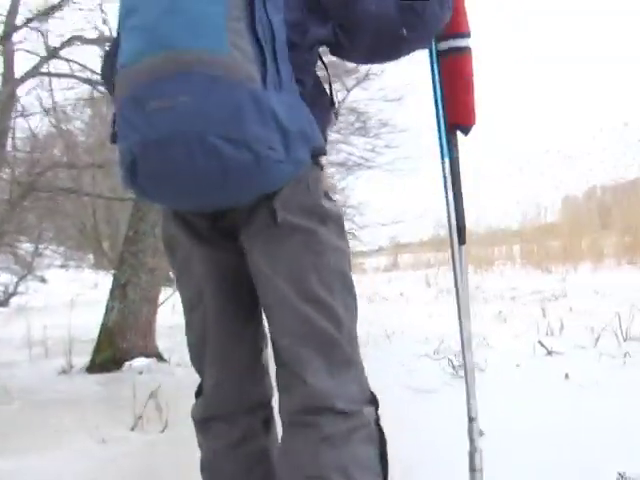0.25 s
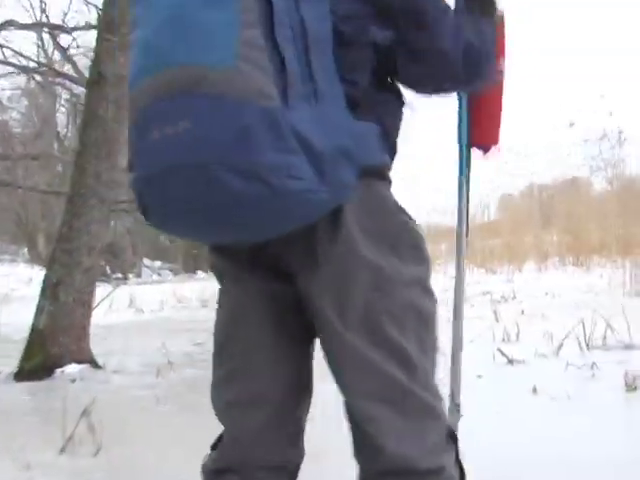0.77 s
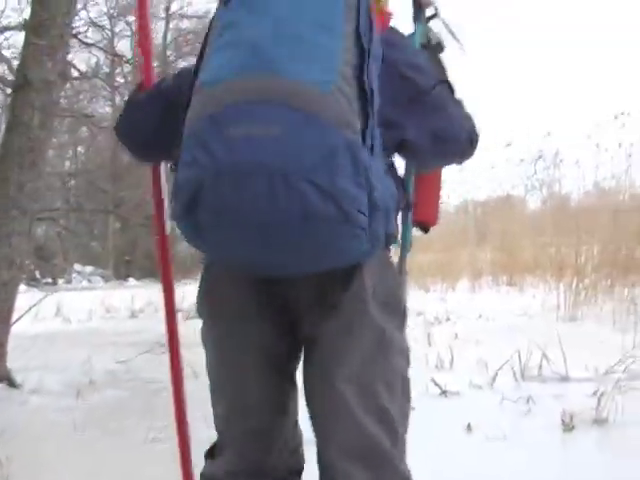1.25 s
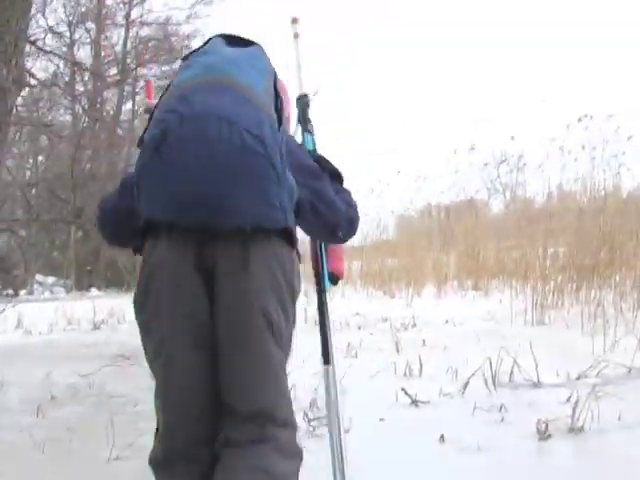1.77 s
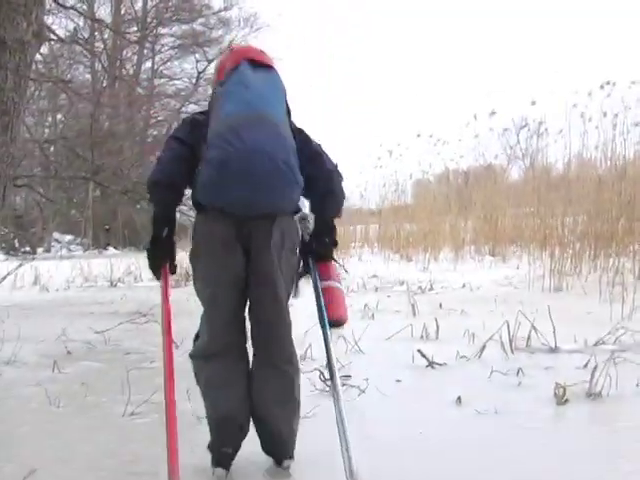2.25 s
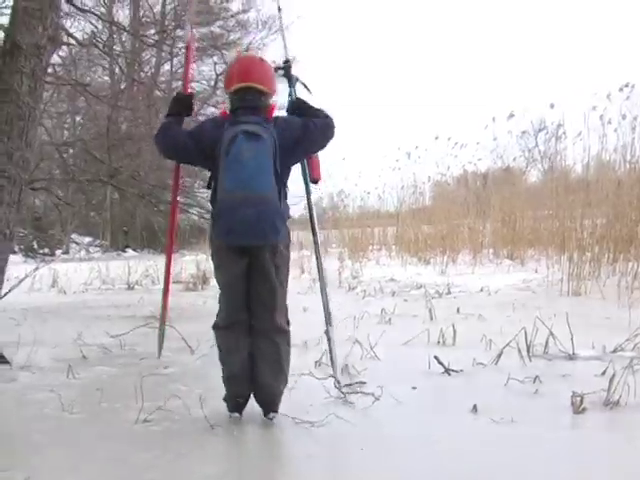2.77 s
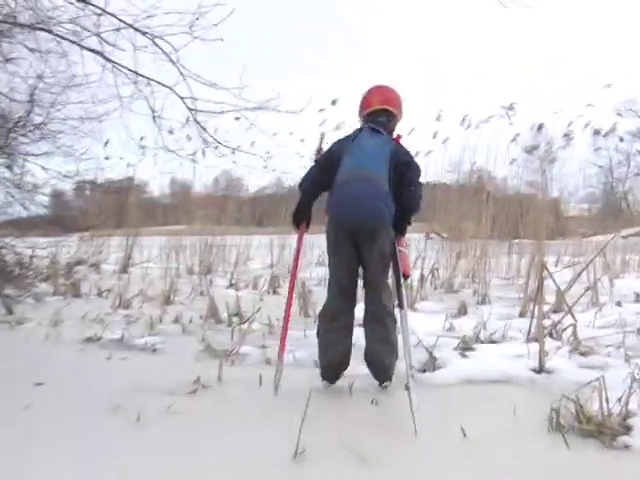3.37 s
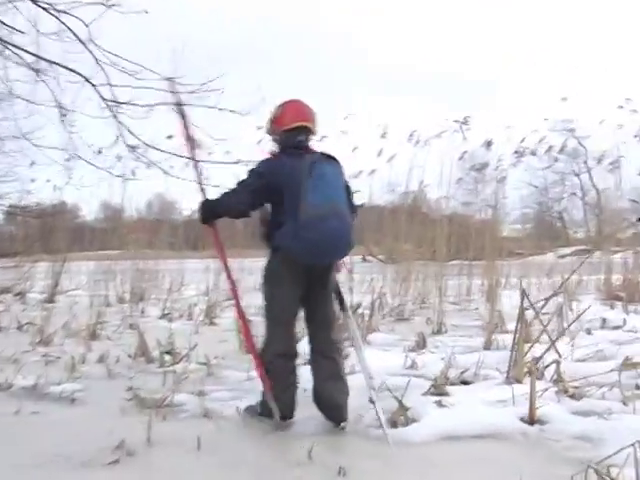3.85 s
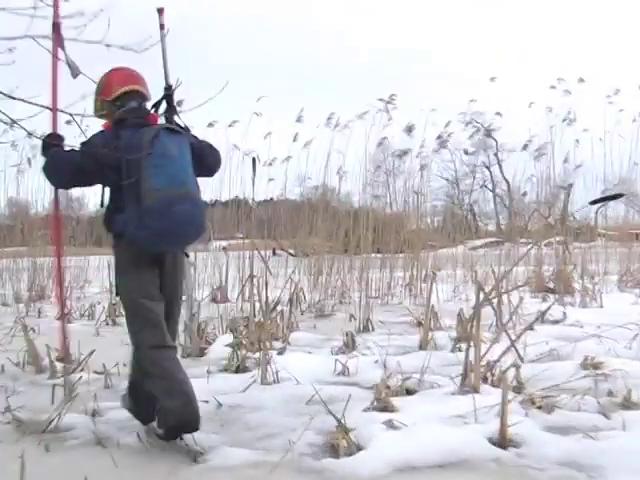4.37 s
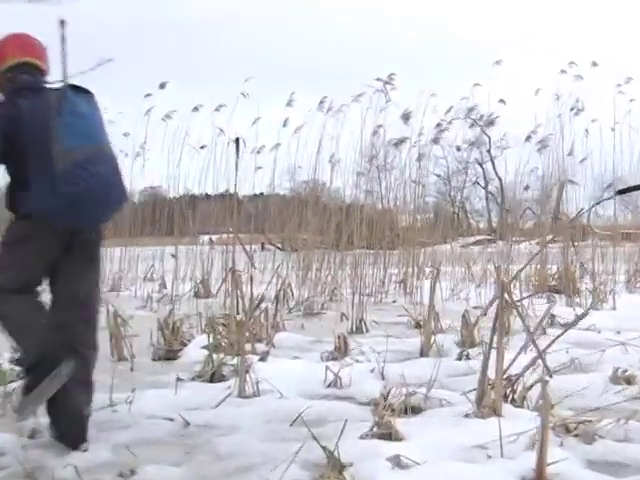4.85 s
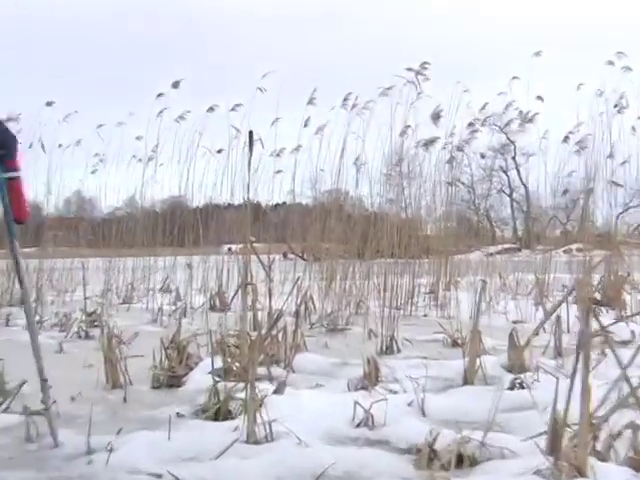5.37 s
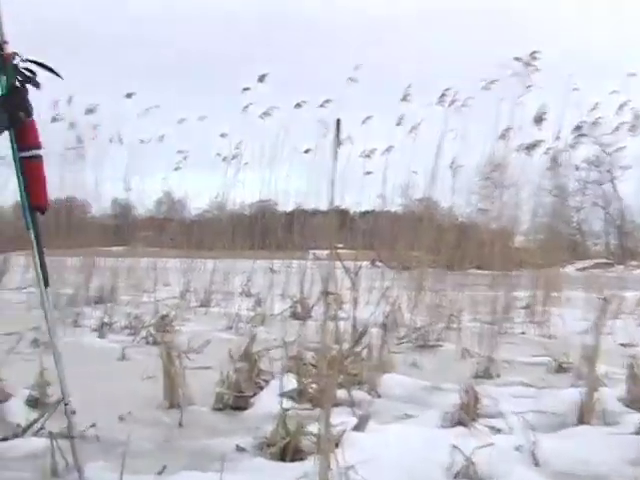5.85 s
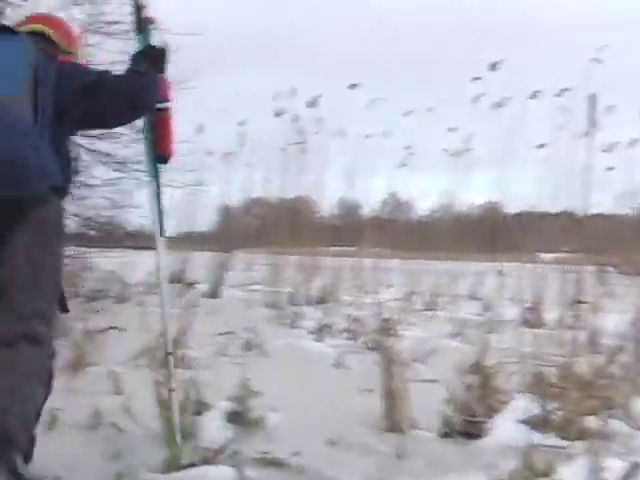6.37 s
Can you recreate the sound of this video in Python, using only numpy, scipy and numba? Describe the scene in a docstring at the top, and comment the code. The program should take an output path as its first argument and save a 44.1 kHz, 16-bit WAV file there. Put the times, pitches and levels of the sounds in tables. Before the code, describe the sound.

Boots and poles crunch through frozen snow crust on lake ice, with dull knocks, sharp crackles and a growing rustle of dry reeds.

```python
"""Boots and ski poles break a frozen snow crust on lake ice. A faint open-air murmur comes first.
From 0.6 s on, each break is a shower of ice grains: a dull knock in the ice sheet, a crunch in the
crust, a fizz of crystals. Around 2 s something hard squeaks as it is dragged over the ice.
Loose snow and dry reeds rustle between the breaks and grow louder towards 6 s. Mostly after 5 s,
the crust crackles sharply, a blade chatters and glides, and a few reed stems snap."""
import sys
import numpy as np
from scipy import signal
from scipy.fft import rfft, irfft, next_fast_len
from scipy.io import wavfile
from scipy.ndimage import uniform_filter1d
from numba import njit

SR = 44100
rng = np.random.default_rng(int(sys.argv[2]) if len(sys.argv) > 2 else 0)


def file_out(sig):
    """Save sig as 16-bit WAV at sys.argv[1]."""
    # one column per channel
    cols = np.atleast_2d(sig).T
    # limit, then scale
    lim = np.clip(cols, -1, 1)
    pcm = np.round(lim * 32767).astype(np.int16)
    wavfile.write(sys.argv[1], SR, pcm)


N = 291501

# crust breaks: t/s, crunch level/dB, knock and fizz/dB above crunch, crunch f/Hz, knock f/Hz,
# rise/ms, fall/ms
BREAKS = [(0.58, -26.5, -5.5, -16, 2250, 396, 0.45, 3), (0.5957, -17, -7, -8, 2160, 432, 0.15, 3.7),
          (0.615, -21, -16, -29, 1380, 294, 0.51, 1.4), (0.68, -24, 5.5, -10, 2220, 453, 0.59, 3.8),
          (0.824, -45, 3, 4.5, 2070, 181, 2.4, 3.2), (0.8529, -23.5, 4, -12, 2120, 354, 0.4, 6.3),
          (0.967, -33, -7.5, -9, 1980, 237, 8.7, 6.1), (1.023, -32.5, -5.5, -14, 2270, 171, 3, 5.5),
          (1.108, -30, -8, -7, 2140, 366, 1.1, 5.3), (1.142, -38.5, -4, 4.5, 1440, 191, 8, 25),
          (1.233, -31.5, -10, -8, 2210, 230, 2.7, 10), (1.25, -39, 4, -9, 2300, 375, 4.5, 1.8),
          (1.282, -32.5, 0, -5, 1560, 318, 3.6, 5.8), (1.33, -27, -10.5, -9.5, 2040, 194, 5.7, 4.7),
          (1.357, -26, 4.5, -26, 2250, 414, 0.98, 4.5), (1.454, -27, -3, -9, 2230, 180, 8.3, 1.6),
          (1.502, -42, 12.5, 2, 2750, 398, 11, 0.8), (1.571, -19, -5.5, -5, 1550, 218, 1.8, 2.7),
          (1.633, -24.5, 0.5, -9.5, 2310, 430, 2.6, 4.8), (1.78, -25.5, -6, -15, 1490, 417, 1.7, 16.4),
          (1.841, -33.5, -30, -8, 1510, 736, 6.5, 3.5), (1.905, -26.5, -4, -0.5, 2680, 166, 1.1, 1.4),
          (1.962, -32, -25, -5, 1670, 500, 1.5, 7), (1.986, -33, 1, -4, 1530, 190, 0.66, 6.6),
          (2.054, -26.5, 5.5, -10, 1410, 400, 5.8, 3.4), (2.152, -35.5, -2.5, -3, 1390, 181, 8.6, 10),
          (2.22, -28, 7, -3, 2250, 730, 4.5, 2.9), (2.292, -39, -1, 11.5, 2200, 490, 0.37, 2.3),
          (2.4, -32, 0.5, -7, 2270, 410, 1.3, 1.5), (2.477, -31, -24, 5.5, 2900, 410, 0.7, 6.7),
          (2.495, -31, -21, -3, 2610, 410, 2.1, 28), (2.65, -32, -3, -5, 2220, 181, 0.76, 1.9),
          (2.753, -24.5, 0.5, -30, 2295, 412, 0.27, 2.1), (2.898, -30, -22, -10, 2070, 182, 13, 4.6),
          (2.929, -25.5, -12.5, -12, 1990, 177, 0.51, 8.7), (2.971, -22.5, -8.5, 0.5, 1930, 140, 1.4, 6),
          (3.024, -20.5, -5, -4, 2150, 500, 6.8, 1.3), (3.042, -25, -1, 5, 1500, 406, 6.8, 2),
          (3.152, -16.5, -10, -1, 2310, 146, 1.5, 2.3), (3.185, -19, -5.5, 2, 2000, 366, 4.1, 2),
          (3.243, -26.5, -0.5, -4, 1520, 363, 0.98, 2.7), (3.27, -14, -4.5, -8, 2260, 385, 2.9, 2.7),
          (3.355, -16, -7.5, -5, 1660, 660, 1.4, 3.6), (3.409, -18, 1.5, -4, 2240, 795, 1.5, 2),
          (3.508, -19.5, -6.5, -4, 2140, 425, 2, 8.6), (3.542, -18.5, -10, 2, 2020, 141, 1.4, 2.5),
          (3.564, -20.5, -39, -1, 2420, 320, 0.27, 0.5), (3.636, -15.5, -6.5, -4, 2340, 710, 2.2, 1.9),
          (3.681, -16, -16, -24, 1900, 695, 0.36, 1), (3.699, -16.5, -17, -22, 2310, 443, 0.55, 0.61),
          (3.755, -23.5, -2, 2.5, 2210, 156, 0.89, 2.2), (3.863, -18.5, -6.5, -4, 2120, 493, 0.91, 6.5),
          (3.934, -18.5, -3.5, -5.5, 2075, 356, 11, 9.7), (4.005, -21.5, 2, -7, 2040, 635, 2.1, 2.3),
          (3.615, -27, -27, 0, 2354, 404, 0.4, 1.1), (4.086, -20, -32, -8, 2030, 192, 0.66, 4.1),
          (4.142, -24, -2.5, 1.5, 2170, 170, 2.9, 1.8), (4.206, -25.5, 0.5, -1, 1790, 348, 3.5, 8.4),
          (4.402, -15.5, -3, -8, 2280, 450, 7.6, 2.8), (4.46, -19, -11, -22, 1900, 406, 8.1, 1.4),
          (4.493, -17, -3, -27, 2000, 382, 5.5, 1.9), (4.529, -26.5, 1, -14, 1910, 366, 1.8, 12),
          (4.607, -28.5, 0.5, 0.5, 2030, 178, 10, 2.4), (4.624, -13.5, -11.5, -14, 2190, 415, 1.3, 2.2),
          (4.638, -12, -23, -6.5, 1970, 800, 1.8, 2.5), (4.717, -32, 4, -18, 2270, 325, 0.83, 2.1),
          (4.747, -16.5, -1.5, -3.5, 2000, 413, 6.3, 7), (4.864, -21.5, -23, -21, 1940, 150, 12, 1.4),
          (4.91, -13.5, -7, -5.5, 2040, 368, 2.6, 4.2), (4.953, -23.5, -6.5, -6, 2210, 380, 3.1, 4.1),
          (4.966, -22, -5, -7.5, 1680, 226, 1.8, 1.3), (5.0225, -26, 8.5, -21, 2000, 396, 0.26, 3.1),
          (5.032, -29, 8, -25, 1900, 413, 0.6, 0.32), (5.083, -18.5, 0.5, -15, 1870, 385, 1.6, 2.2),
          (5.09, -20.5, 2, -14, 2240, 554, 2.8, 0.75), (5.282, -21, 0.5, -3, 2230, 392, 2.4, 2.7),
          (5.712, -16, -31, -6, 2220, 388, 0.4, 1.1), (6.241, -19.5, -3.5, -32, 1650, 406, 1.5, 0.44),
          (6.315, -21, -1, -8, 1980, 380, 15, 1.2), (6.387, -28.5, 3.5, 3.5, 2880, 420, 1.6, 15),
          (6.455, -22, -2.5, -13, 1400, 425, 0.95, 1.2), (6.48, -17.5, -26, -22, 1370, 330, 0.65, 2.1),
          (6.525, -22.5, 4.5, -2, 1740, 674, 2.2, 4.3), (6.566, -14.5, -6, -3.5, 1330, 480, 2.2, 0.39)]
# short, sharp crackles of breaking crust: t/s, level/dB, f/Hz
CRACKLES = [(3.6641, -19, 2100), (3.7124, -16.5, 1950), (5.1756, -10, 1970), (5.2011, -11, 1930),
            (5.2255, -15, 1610), (5.3263, -11, 2050), (5.3428, -10, 2090), (5.475, -17.5, 1900),
            (5.5428, -11, 2250), (5.6945, -18, 2180), (5.9763, -14, 2230), (6.178, -15.5, 1330),
            (6.5544, -14, 2130)]
# the tones that crust, ice sheet and crystals ring with: f/Hz, width/Hz, level/dB
CRUST_TONES = [(1414, 198, 5), (1679, 97, 5.5), (1880, 114, 6), (2264, 443, 6.5), (2880, 560, 3)]
ICE_TONES = [(118.3, 22, -14), (195, 57, 3.5), (355, 53, -2), (435, 86, -3.5), (872, 395, 0.5)]
CRYSTAL_TONES = [(3400, 1210, 2), (6370, 1680, -1.5), (8450, 1360, -6)]
# constant rustle of snow and reeds: t/s, crunch level/dB, fizz and rumble/dB above crunch, deep ice/dB
RUSTLE_BED = [(0, -99, -34, 12, -69), (.3, -56.5, 0.5, -12, -83), (.54, -55.5, -5, 2, -61),
              (.62, -55.5, -5, -16, -65), (.93, -61, 1, -11, -53), (1.3, -48, -2, -13, -57),
              (2, -49.5, -1, -6.5, -59), (2.5, -50.5, 3, -11, -53), (2.86, -50.5, -1.5, -24, -59),
              (3.1, -52.5, 3.5, -4.5, -45.5), (3.7, -41, 0, -9.5, -45), (4.34, -46.5, -1.5, -12, -53.5),
              (4.85, -42.5, 0.5, -9, -44), (5.2, -33, -4, -13.5, -50.5), (5.7, -31, -5, -9, -43),
              (6.0, -28.5, -5, -4, -49), (6.22, -29.5, -8.5, -3, -57), (6.3, -34.5, -6.5, -4, -61),
              (6.5, -35, -14.5, 0.5, -69), (6.61, -36.5, 6, 4.5, -50)]
# boot scuffs, blade glides and squeaks: t/s, level/dB, rise/ms, fall/ms
SCUFFS = [(.47, -45, 26, 66), (.76, -52, 78, 140), (.97, -44, 12, 94), (1.15, -43.5, 62, 85),
          (1.5, -45.5, 18, 45), (1.79, -36, 21, 11), (2.04, -42, 130, 180), (2.23, -37.5, 77, 88),
          (2.45, -43, 15, 17), (2.52, -43.5, 11, 190), (2.98, -33.5, 45, 30), (3.04, -33, 30, 71),
          (3.15, -36.5, 30, 160), (3.4, -31, 41, 31), (3.47, -32.5, 64, 100), (3.71, -27, 86, 43),
          (3.37, -29.5, 39, 15), (3.797, -36, 1.9, 11), (3.825, -26.5, 21, 20), (4.06, -26, 20, 7.5),
          (4.31, -28.5, 7.4, 9.4), (3.87, -20.5, 9.2, 21), (4.02, -24.5, 35, 13), (4.1, -27, 19, 34),
          (4.18, -22, 30, 72), (4.27, -26, 12, 24), (4.45, -27, 44, 119), (4.74, -32, 13, 72),
          (5.15, -25, 79, 56), (5.25, -27.5, 28, 42), (5.34, -26.5, 8, 74), (5.47, -26, 58, 7.2),
          (5.51, -22, 19, 5.9), (5.55, -29.5, 35, 54), (5.73, -24, 86, 60), (6.34, -26, 25, 38),
          (5.86, -27, 20, 72)]
GLIDES = [(5.4, -40, 270, 260), (6.1, -30.5, 330, 160)]
SQUEAKS = [(1.99, -44.5, 120, 120), (2.16, -48, 41, 110), (2.5, -51, 84, 70)]
# the tones of the glides and squeaks: f/Hz, width/Hz, level/dB
GLIDE_TONES = [(365, 95, 2), (892, 90, -7.5), (1960, 140, 1.5), (2250, 130, -2.5)]
SQUEAK_TONES = [(1410, 46, 2), (2700, 150, -8.5)]
# knocks in the ice: mostly the blade chattering over knobbly ice after 5.2 s, plus a few lone knocks of
# breaking crust earlier on: t/s, level/dB, f/Hz
CHATTER = [(1.086, -33, 200), (3.552, -27, 397), (3.711, -25.5, 392), (5.242, -22.5, 516),
           (5.298, -27, 353), (5.329, -21.5, 434), (5.359, -24, 384), (5.394, -23, 350), (5.43, -25, 386),
           (5.46, -21.5, 335), (5.59, -17.5, 375), (5.62, -22, 440), (5.726, -21.5, 370), (5.756, -19, 342),
           (5.786, -24.5, 352), (5.848, -23, 335), (5.921, -20, 424), (5.979, -22, 314), (6.096, -25, 310),
           (6.161, -18, 397), (6.204, -19, 336), (6.226, -21, 400)]
# reed stems snapping: t/s, level/dB
REED_TICKS = [(5.255, -24.5), (5.903, -29), (5.9347, -25.5), (6.337, -28), (6.389, -27)]
# a faint thin rustle: one swell (t/s, level/dB, rise/ms, fall/ms), one tone (f/Hz, width/Hz, level/dB)
THIN_RUSTLE = (0.035, -53, 50, 70), (2900, 500, 0)
# loudness of the open-air murmur: t/s, level/dB
AIR_LEVEL = [(0, -46.5), (.44, -48), (.6, -53.5), (1, -62), (2.8, -57.5), (6.61, -61)]
# its balance from bass to treble: f/Hz, level/dB
AIR_COLOUR = [(30, -20), (70, -4), (130, -6), (300, -16), (480, -13), (1100, -12.5), (1400, -25.5),
              (3200, -38.5), (10000, -68)]
# its hollow tones: f/Hz, width/Hz, level/dB
AIR_TONES = [(490, 45, 0), (770, 54, -4.5), (1010, 97, -10.5)]
# where the action sits: t/s, left minus right/dB
PAN = [(0, -4), (.6, -1), (1.3, -2.5), (2.5, -2), (3.7, -1.5), (5.2, -0.5), (6.1, -3), (6.61, -2.5)]
# balance of the microphone's two openings (ports): f/Hz, left minus right/dB
PORT_BALANCE = [(60, -4.5), (200, -0.5), (500, 0), (1100, 5.5), (2000, 4), (4000, 2.5), (9000, 2.5)]
# how far the left port is ahead: f/Hz, phase/rad
PORT_LEAD = [(40, 0.21), (260, 0.52), (2300, 0.087), (7000, 0.17), (9500, 1)]
# sound the ports do not have in common: f/Hz, share/fraction
PORT_APART = [(40, 0.35), (150, 0.033), (600, 0.15), (2000, 0.14), (4200, 0.1), (9000, 0.34)]


def crust_breaks(grit):
    """Each break builds up, snaps and crumbles away; the piece that snaps rings at its own pitch."""
    before, after = 1000, 4000  # samples around each peak
    force, snap = np.zeros((3, N + after)), np.zeros((3, N))  # rows: crunch, knock, fizz
    pitch_hz = np.ones((2, N)) * [[2000.], [350.]]
    ms = np.arange(-before, after) / SR * 1000
    for s, db, knock_db, fizz_db, crunch_hz, knock_hz, rise_ms, fall_ms in BREAKS:
        peak, size = int(s * SR), undb(db + np.array([0, knock_db, fizz_db]))
        shape = np.where(ms < 0, np.exp(ms / max(rise_ms, .2)), np.exp(-np.abs(ms) / max(fall_ms, .5)))
        force[:, peak - before:peak + after] += size[:, None] * shape
        snap[:, peak - 40] = size / (1 + rise_ms / 44)  # a slow crush has little clean snap
        pitch_hz[:, peak - int(rise_ms * SR / 500) - 40:] = [[crunch_hz], [knock_hz]]
    snap[1] = smooth(snap[1], 28)  # the sheet takes a blunter push
    even_grit = grit / np.sqrt(uniform_filter1d(grit ** 2, size=220))  # packed crust gives way evenly
    crunch, knock, fizz = force[:, :N] * even_grit
    crust = undb(-1.5) * ring(crunch, CRUST_TONES)
    piece = band_pass(undb(16.5) * crunch + undb(38) * snap[0], pitch_hz[0], 113.)
    push = undb(8.5) * knock + undb(44.5) * snap[1]
    slab = band_pass(push, pitch_hz[1], 86.)
    overtone = undb(-9.5) * band_pass(push, 1.58 * pitch_hz[1], 200.)
    sheet = undb(-1) * ring(knock * (220 / pitch_hz[1]) ** 0.9, ICE_TONES[1:])  # big slabs stir it most
    crack = undb(14.5) * np.roll(snap[2], 40)  # lands right on the peak
    crystals = undb(-2.5) * ring(flip(fizz) + crack, CRYSTAL_TONES)
    return crust + piece + slab + overtone + sheet + crystals


def crust_crackles():
    """Breaking crust gives short, sharp crackles."""
    return pings(CRACKLES, rise_ms=0.38, fall_ms=7.6, rough=0.77, gain_db=-6.5)


def snow_rustle(grit):
    """Loose snow shifts in clumps, shaking crust, ice and crystals together."""
    bed_db, fizz_db, rumble_db, _ = curves(RUSTLE_BED)
    crumbs = [(s, db - 28, 2, 77) for s, db, *_ in BREAKS]  # they slide on after each break
    db = 10 * np.log10(undb(2 * bed_db) + swells(SCUFFS, edge=1.82) + swells(crumbs))
    lift_db = db - bed_db  # a scuff lifts the crunch more than the fizz and rumble
    fizz_db, rumble_db = fizz_db - 0.25 * lift_db, rumble_db - 0.18 * lift_db
    clumping = 1.9 + 0.0825 * (bed_db.max() - bed_db)  # a quiet rustle is more uneven
    db = db + clumping * (.5 * waver(60) + .8 * waver(200))
    crunch = undb(-1.5) * ring(grit, CRUST_TONES) + undb(-3.5) * ice_chips(220, 1590, 2395, 140., 4.4)
    rumble = ring(flip(grit), ICE_TONES[2:]) + undb(-3) * ice_chips(120, 310, 463, 130., 2.8)
    rumble += undb(-5.5) * ring(grit, ICE_TONES[:2])
    fizz = undb(-1.4) * ring(flip(grit), CRYSTAL_TONES)
    fizz += undb(-10) * ice_chips(260, 2530, 9400, 220., 3.2)
    rumble *= undb(rumble_db + 1.4 * waver(30))
    fizz *= undb(fizz_db + 1.06 * waver(40))
    return undb(db) * (crunch + rumble + fizz)


def ice_chips(per_s, low_hz, high_hz, width_hz, spread_db):
    """Chips of ice spring loose now and then, each ringing briefly at a random pitch."""
    hits, strength, pitch = rng.random(N) < per_s / SR, rng.exponential(1, N), rng.random(N)
    latest_hit = np.maximum.accumulate(np.where(hits, np.arange(N), 0))
    kicks = hits * undb(spread_db * np.minimum(strength, 3))
    hz = low_hz * (high_hz / low_hz) ** pitch[latest_hit]
    return unit(band_pass(kicks + 1e-18, hz, width_hz))


def blade(grit):
    """A blade glides and chatters over knobbly ice; a few lone knocks of breaking crust ring the same way."""
    glide = ring(flip(grit) * np.sqrt(swells(GLIDES, edge=3.3)), GLIDE_TONES)
    chatter = pings(CHATTER, rise_ms=0.79, fall_ms=4.6, rough=0.57, gain_db=-0.26)
    return glide + chatter


def squeak(grit):
    """Something hard sticks and slips in short bouts as it is dragged over the ice."""
    return ring(grit * np.sqrt(swells(SQUEAKS)) * undb(8.6 * waver(90)), SQUEAK_TONES)


def reed_ticks():
    """Thin dry stems snap and ring only in the treble."""
    force, fade = np.zeros(N), np.exp(-np.arange(600) / SR / 0.0073)
    for s, db in REED_TICKS:
        force[int(s * SR):][:len(fade)] += undb(db) * fade
    return ring(force * rng.standard_normal(N), [(7400, 1700, 0)])


def deep_ice():
    """The ice sheet rumbles on and booms a little under each knock, most under the low ones."""
    thumps = [(s, db + knock_db - 12.5 - 6 * np.log2(hz / 220), 4, 8.5)
              for s, db, knock_db, _, _, hz, *_ in BREAKS]
    rumble_db = curves(RUSTLE_BED)[-1] + 2.5 * waver(10)
    force = np.sqrt(undb(2 * rumble_db) + swells(thumps))
    return ring(rng.standard_normal(N) * force, [(69.6, 31, -2.5), (123, 107, 0)])


def thin_rustle(grit):
    """Loose grains make one faint, high rustle at the very start."""
    swell, tone = THIN_RUSTLE
    return ring(grit * np.sqrt(swells([swell])), [tone])


def air_murmur():
    """The open air murmurs in wavering bands of noise, with a few hollow tones."""
    bands = 0
    for hz in 40 * 2 ** np.arange(0, 8, 1 / 3):
        shared, side = (band_pass(rng.standard_normal(N), np.full(N, hz), hz / 4) for _ in range(2))
        gain = undb(at_pitch(AIR_COLOUR, hz) + 2.1 * waver(13))
        bands = bands + gain * (shared + 0.61 * side * np.array([[1], [-1]]))
    hollow = undb(-5) * ring(rng.standard_normal(N) * undb(4.6 * waver(25)), AIR_TONES)
    return (unit(bands) + hollow) * undb(curves(AIR_LEVEL)[0])


def grains(per_s, spread_db, hiss):
    """Random snaps, many small and few large, over the hiss of those too fine to count."""
    chance, size, noise = rng.random(N), rng.exponential(1, N), rng.standard_normal(N)
    snaps = (chance < per_s / SR) * np.sign(noise) * undb(spread_db * np.minimum(size, 4))
    return unit(unit(snaps) + hiss * noise)


def flip(x):
    """The same grains with random signs: another body feels them at the same moments, in its own way."""
    return x * np.sign(rng.standard_normal(N))


def pings(rows, rise_ms, fall_ms, rough, gain_db):
    """Short rings, each at its own pitch, roughened by a random drift."""
    t = np.arange(1500) / SR
    sound = np.zeros(N + len(t))
    shape = (1 - np.exp(-t * 1000 / rise_ms)) * np.exp(-t * 1000 / fall_ms)
    for s, db, hz in rows:
        drift = np.cumsum(rng.standard_normal(len(t))) * rough * np.sqrt(hz / SR)
        tone = np.sin(2 * np.pi * hz * t + drift)
        sound[int(s * SR):][:len(t)] += undb(db + gain_db) * shape / shape.max() * tone
    return sound[:N]


def swells(rows, edge=1):
    """Summed power of swells (t/s, level/dB, rise/ms, fall/ms); a larger edge gives flatter tops."""
    samples, power = np.arange(0, N, 20), 1e-12
    for s, db, rise_ms, fall_ms in rows:
        late_ms = (samples / SR - s) * 1000
        span_ms = np.where(late_ms < 0, max(rise_ms, 1), max(fall_ms, 1))
        power = power + undb(2 * db) * np.exp(-2 * (np.abs(late_ms) / span_ms) ** edge)
    return np.interp(np.arange(N), samples, power)


def ring(x, tones):
    """A body shaken by x rings with its tones (f/Hz, width/Hz, level/dB); white noise keeps its level."""
    total = sum((-1) ** k * undb(db) * band_pass(x, np.full(N, float(hz)), float(width))
                for k, (hz, width, db) in enumerate(tones))
    return total / np.sqrt(sum(undb(2 * db) * np.pi * width / SR for _, width, db in tones))


@njit
def band_pass(x, hz, width_hz):
    """Lets through the sound near a pitch that may move."""
    y, band_state, low_state = np.empty(len(x)), 0., 0.
    for i in range(len(x)):
        tuning, damping = np.tan(np.pi * hz[i] / SR), width_hz / hz[i]
        band = (band_state + tuning * (x[i] - low_state)) / (1 + tuning * (tuning + damping))
        band_state, low_state = 2 * band - band_state, low_state + 2 * tuning * band
        y[i] = damping * band
    return y


def waver(per_s):
    """A smooth random wobble around zero."""
    hold = int(SR / per_s)
    return 1.046 * smooth(np.repeat(rng.standard_normal(N // hold + 1), hold), hold)[:N]


def smooth(x, samples):
    return uniform_filter1d(uniform_filter1d(x, samples), samples)


def curves(table):
    """Joins a table's points in time, giving one curve for each value column."""
    times, *columns = np.transpose(table)
    return [np.interp(np.arange(N) / SR, times, column) for column in columns]


def at_pitch(table, hz):
    """Reads a table of f/Hz, value with the octaves evenly spaced."""
    table_hz, values = np.transpose(table)
    return np.interp(np.log(np.maximum(hz, 1)), np.log(table_hz), values)


def undb(db):
    return 10 ** (np.asarray(db) / 20)


def unit(x):
    return x / np.sqrt(np.mean(x ** 2))


def ground_sounds():
    """Everything on the ice, made from one fresh set of grains and placed a little to the right."""
    loose = grains(per_s=1500, spread_db=1.5, hiss=0.96)
    packed = grains(per_s=9100, spread_db=3, hiss=1)
    sound = snow_rustle(loose) + crust_breaks(packed) + squeak(packed) + reed_ticks() + deep_ice()
    sound += blade(packed) + crust_crackles() + thin_rustle(loose)
    pan_db = curves(PAN)[0]
    return sound * undb(np.array([pan_db, -pan_db]) / 2)


def scene():
    """Both ports hear mostly the same grains, coloured and shifted by the small camera they sit in."""
    size, sides = next_fast_len(N + SR // 4), np.array([[1], [-1]])
    hz = np.arange(size // 2 + 1) * SR / size
    apart = np.clip(at_pitch(PORT_APART, hz), 0, .95)
    shared = np.sqrt(1 - apart ** 2) * rfft(ground_sounds(), size)
    unshared = sides * apart * rfft(ground_sounds(), size)
    balance = undb(sides * at_pitch(PORT_BALANCE, hz) / 2)
    lead = np.exp(.5j * sides * at_pitch(PORT_LEAD, hz))
    return irfft((shared + unshared) * balance * lead, size)[:, :N] + air_murmur()


def record(dry):
    """The microphone loses the deep bass, rounds the loudest snaps and cuts the highest treble."""
    low_hz, top_hz, ceiling = 50, 9600, 0.45
    x = signal.sosfilt(signal.butter(3, low_hz, "high", fs=SR, output="sos"), dry)
    x = ceiling * np.tanh(x / ceiling)
    return signal.sosfilt(signal.ellip(9, .5, 80, top_hz, fs=SR, output="sos"), x)


dry = scene()
out = record(dry)
file_out(out)
```